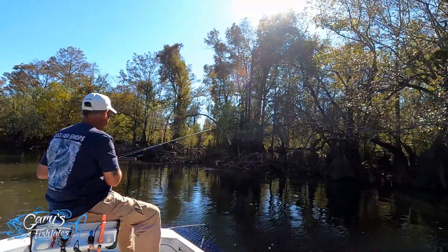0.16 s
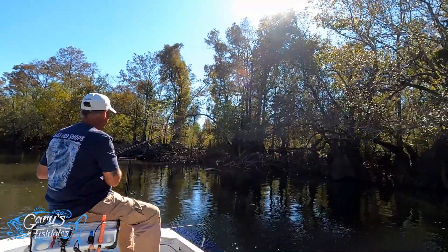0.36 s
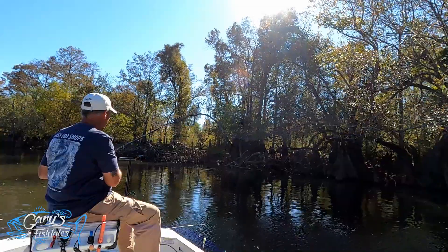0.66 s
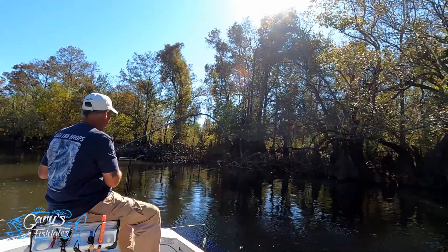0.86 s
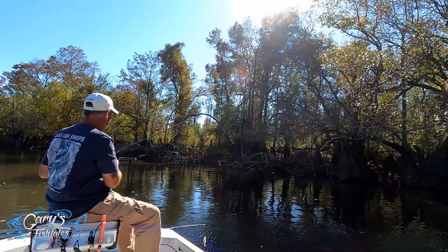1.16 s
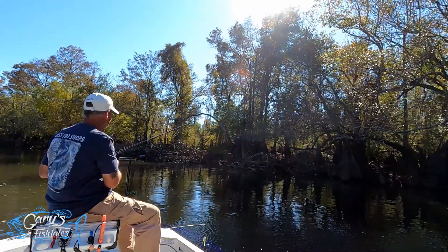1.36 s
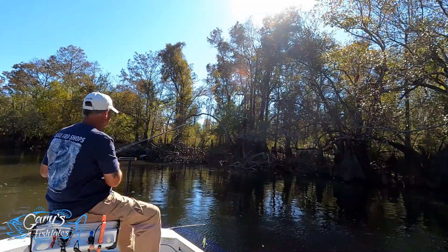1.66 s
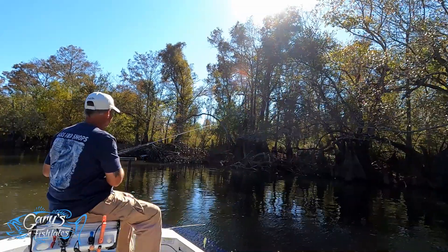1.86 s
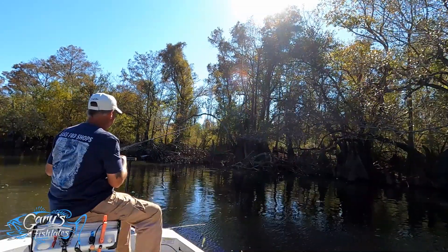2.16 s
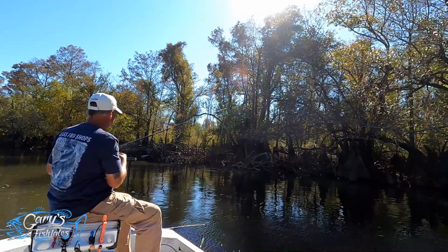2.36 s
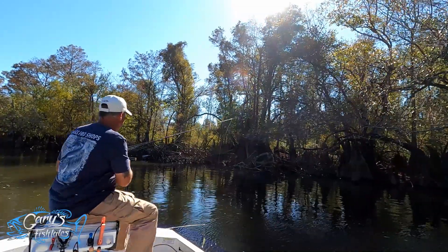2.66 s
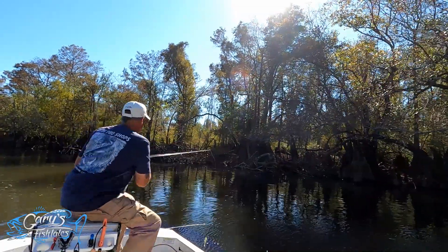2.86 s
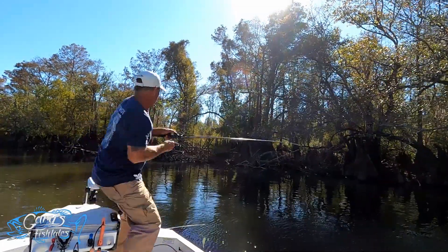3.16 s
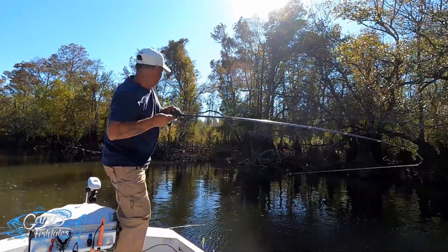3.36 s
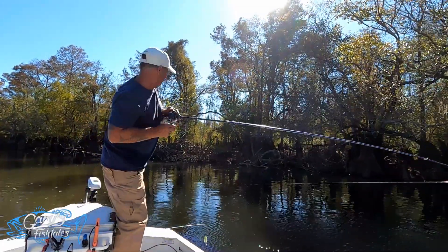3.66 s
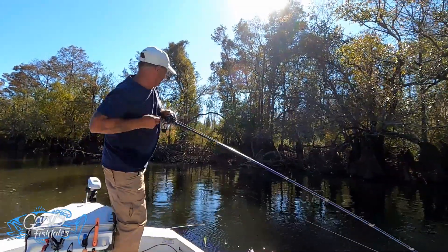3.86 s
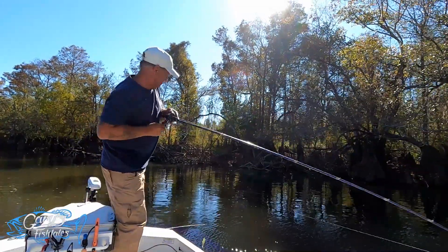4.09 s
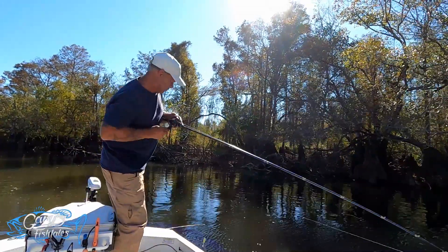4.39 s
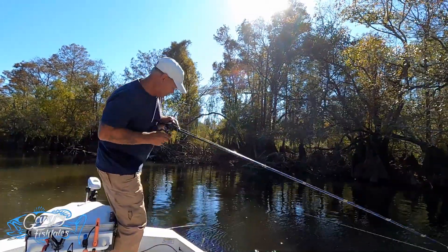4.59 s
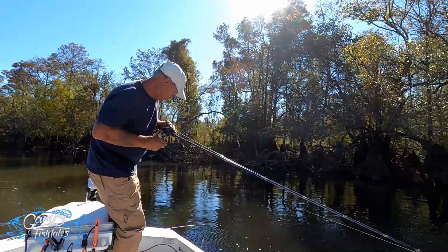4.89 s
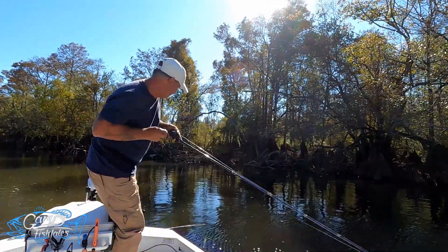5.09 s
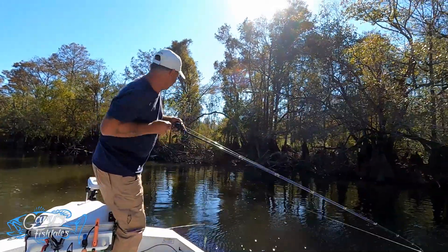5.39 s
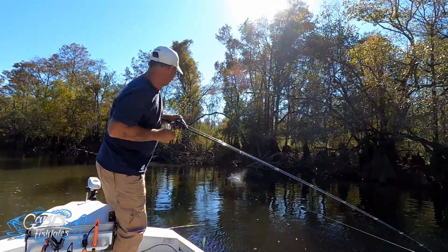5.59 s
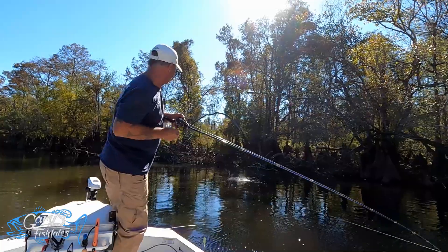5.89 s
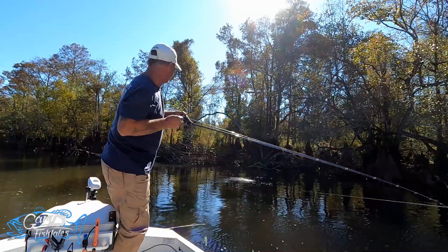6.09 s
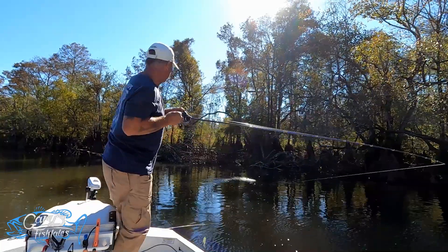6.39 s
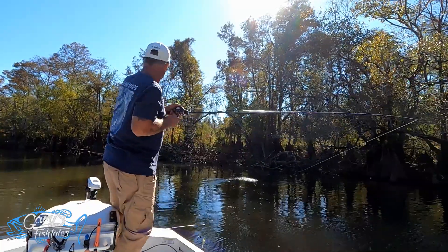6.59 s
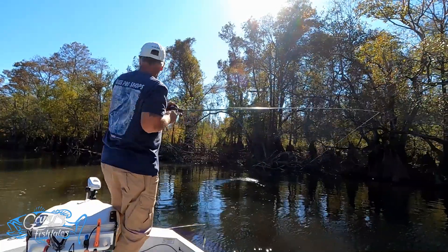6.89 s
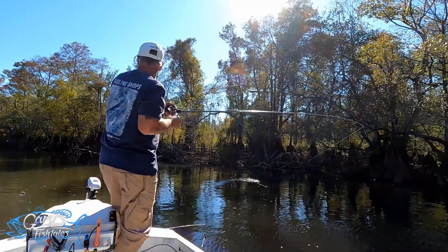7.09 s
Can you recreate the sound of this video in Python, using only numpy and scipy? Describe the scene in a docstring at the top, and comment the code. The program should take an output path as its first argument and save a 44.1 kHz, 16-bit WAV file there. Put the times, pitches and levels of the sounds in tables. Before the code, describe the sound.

Outdoors in a small boat, low wind buffets a housed microphone over a faint hiss of trees and water. Sharp tackle knocks and a brief ratcheting drag lead to a cluster of clatters and hollow deck thuds as an angler stands. Soles scuff and squeak twice. A quiet reel whirrs in pulses, then a fish thrashes with wet cracks, plops and ringing droplets, thinning to quiet reeling.

```python
"""A hooked fish thrashes at the surface of still water: droplets and bubbles ring, its tail cracks on the water.
An angler in a small boat stands up and reels in: noise through resonances makes the tackle's knocks and the
reel's whirr, damped sines the deck's thuds, grains the scuffing soles and unsteady harmonics their squeaks.
Wind buffets the housed microphone as lumpy filtered noise; trees and water rustle far off as smooth hiss."""
import sys
import numpy as np
from scipy import signal
from scipy.fft import rfft, irfft, next_fast_len
from scipy.io import wavfile
from scipy.ndimage import uniform_filter1d

SR = 44100
rng = np.random.default_rng(int(sys.argv[2]) if len(sys.argv) > 2 else 0)


def ratio_of_db(decibels):
    """Turn decibels (scalar or array-like) into linear amplitude factors; 0 dB maps to 1."""
    return 10 ** (np.asarray(decibels, float) / 20)


def bounce(signal):
    """Save signal as a 16-bit WAV file at the path given by the first command-line argument."""
    frames = np.transpose(np.atleast_2d(signal))
    limited = np.clip(frames, -1, 1)
    pcm = np.round(limited * 32767).astype(np.int16)
    wavfile.write(sys.argv[1], SR, pcm)


N = 319725   # samples, 7.25 s


def in_time(rows, outside=None):
    """Columns of a curve, interpolated at every sample; the first column is time in seconds."""
    s, *columns = np.transpose(rows)
    return [np.interp(np.arange(N) / SR, s, c, outside, outside) for c in columns]


def colour(x, points):
    """Shape a spectrum by (Hz, dB) points on a log frequency axis."""
    hz, db = np.transpose(points)
    size = next_fast_len(N + SR // 2)
    grid = np.maximum(np.fft.rfftfreq(size, 1 / SR), 1)
    gain = ratio_of_db(np.interp(np.log(grid), np.log(hz), db))
    return irfft(rfft(x, size) * gain, size)[..., :N]


def level_in(x, low_hz, high_hz):
    """Scale so that the given band has rms 1."""
    part = signal.sosfilt(signal.butter(3, [low_hz, high_hz], "band", fs=SR, output="sos"), x)
    return x / np.sqrt(np.mean(part ** 2) + 1e-20)


def drift(rate_hz):
    """Slow random wander with spread 1: noise through two equal low-pass poles, made at an eighth of the rate."""
    r = np.exp(-16 * np.pi * rate_hz / SR)
    noise = rng.standard_normal((N + SR) // 8 + 2)
    slow = signal.lfilter([1], [1, -2 * r, r * r], noise)[SR // 8:]   # drop the settling
    return np.interp(np.arange(N) / 8, np.arange(len(slow)), slow / slow.std())


def ring(clicks, hz, t60):
    """A unit click sets a decaying sine of height about 1 ringing."""
    r, w = ratio_of_db(-60 / (t60 * SR)), 2 * np.pi * hz / SR
    return signal.lfilter([0, np.sin(w)], [1, -2 * r * np.cos(w), r * r], clicks + 1e-18)


def add(out, s, sound):
    """Mix a short sound in at time s."""
    at = round(s * SR)
    out[at:at + len(sound)] += sound[:N - at]


def grains(per_s, spread_db):
    """Random clicks of uneven size and sign."""
    sizes = ratio_of_db(spread_db * np.minimum(rng.exponential(1, N), 3.5)) * rng.choice([-1, 1], N)
    return sizes * (rng.random(N) < per_s / SR)


def patchy(x, patch_db, rate_hz):
    """Third-octave bands above the bass each swell and fade on their own."""
    edges = 500 * 2 ** (np.arange(16) / 3)
    out = 0
    for k, pair in enumerate(zip(edges, edges[1:])):
        band = signal.sosfilt(signal.butter(2, pair, "band", fs=SR, output="sos"), x)
        out = out + band * ratio_of_db(patch_db * drift(rate_hz)) * (-1) ** k
    return out


def swells(starts, lengths, tops_db, peak_at, sharpness):
    """Arched envelopes, one a stroke, summed by power; peak_at is a share of the length."""
    power, bend = np.zeros(N), np.log(.5) / np.log(np.clip(peak_at, .1, .9))
    for s, length, db in zip(starts, lengths, tops_db):
        share = np.linspace(0, 1, round(length * SR))
        arch = np.abs(np.sin(np.pi * share ** bend)) ** sharpness
        add(power, s, (ratio_of_db(db) * arch) ** 2)
    return np.sqrt(power)


# Far rustle of trees and water. Each row: time in seconds, level in dB.
RUSTLE = [(0, -66), (.35, -66.5), (.8, -64), (1.4, -65.5), (1.65, -66), (2.15, -63.5), (2.35, -69),
          (2.55, -62), (2.95, -56.5), (3.1, -57.5), (3.45, -58), (3.75, -61), (4.2, -67)]
# Spectrum of that far hiss. Each row: frequency in Hz, density in dB per Hz.
RUSTLE_COLOUR = [(500, -19.5), (1000, -0.5), (1700, -1), (2300, -1), (3600, -8.5), (5000, -10.5),
                 (7000, -18.5), (13000, -34)]


def rustle():
    """Many small far sources blend into a smooth hiss."""
    hiss = level_in(colour(rng.standard_normal(N), RUSTLE_COLOUR), 1200, 7000)
    return ratio_of_db(in_time(RUSTLE)[0]) * hiss


# Wind on the microphone. Each row: time in seconds, rumble level in dB, upper flutter level in dB.
WIND = [(0, -43, -65), (.5, -40.5, -60.5), (.63, -38.5, -50.5), (.85, -47, -70.5), (1.35, -42.5, -59),
        (1.45, -38, -53), (1.6, -42, -62), (2.0, -40, -52.5), (2.2, -39.5, -52.5), (2.75, -37.5, -57),
        (2.9, -39.5, -52.5), (3.6, -38.5, -53), (4.8, -41.5, -54.5), (5.2, -44, -60.5), (5.52, -42.5, -55),
        (5.8, -47.5, -53.5), (6.36, -42, -59), (6.66, -46, -59), (6.76, -44.5, -57), (7.25, -45.5, -60.5)]
# Spectrum of the rumble at the port. Each row: frequency in Hz, density in dB per Hz.
RUMBLE_COLOUR = [(20, -15.5), (50, -1.5), (110, 1), (200, -3), (300, -10), (450, -19.5), (900, -75)]
# Spectrum of the upper flutter at the port. Each row: frequency in Hz, density in dB per Hz.
FLUTTER_COLOUR = [(150, -6), (300, 1.5), (500, 3), (820, -3.5), (920, -14), (1200, -45.5)]
# The strongest puffs on the microphone. Each row: start in seconds, level in dB.
PUFFS = [(0.471, -46.5), (1.101, -53), (1.329, -46.5), (1.748, -39), (2.096, -35), (2.203, -40.5),
         (2.426, -51), (2.501, -37.5), (3.065, -34.5), (3.533, -41), (3.584, -52), (3.66, -40),
         (3.748, -47), (3.827, -45), (3.934, -45.5), (3.981, -55), (4.175, -40.5), (4.257, -43.5),
         (4.389, -44), (4.522, -42.5), (4.825, -57), (5.038, -42.5), (5.267, -38.5), (5.375, -39.5)]


def wind():
    """Eddies hit the port in lumps; the upper flutter comes in shorter puffs, the strongest at given moments."""
    puff_rise_s, puff_t60_s, puff_rumble_db = 0.0027, 0.057, -2.5
    rumble_db, flutter_db = in_time(WIND)
    lumps = drift(10.0)
    rumble = colour(rng.standard_normal(N), RUMBLE_COLOUR) * ratio_of_db(1.2 * drift(3.1) + 2.1 * lumps)
    rumble = level_in(rumble, 30, 270)
    flutter = level_in(colour(rng.standard_normal(N), FLUTTER_COLOUR), 450, 850)
    puffs, t = np.zeros(N), np.arange(SR // 8) / SR
    for s, puff_db in PUFFS:
        add(puffs, s, ratio_of_db(puff_db) * np.minimum(t / puff_rise_s, 1) * ratio_of_db(-60 * t / puff_t60_s))
    uneven = ratio_of_db(flutter_db + 2.96 * lumps + 2.9 * drift(60.) + 1.2 * drift(8.8))
    return (ratio_of_db(rumble_db) + ratio_of_db(puff_rumble_db) * puffs) * rumble + (uneven + puffs) * flutter


# Thuds on the hollow deck, close by, and last a low plop of water.
# Each row: start in seconds, level in dB, main mode in Hz, t60 in seconds, rise in seconds.
THUDS = [(0.637, -33.5, 223, 0.085, 0.0033), (1.831, -27.5, 492, 0.1, 0.00076),
         (1.846, -37, 655, 0.063, .002), (1.861, -33, 410, 0.049, 0.0036), (2.028, -29.5, 494, 0.09, .003),
         (2.045, -28.5, 501, 0.037, .003), (2.061, -40, 424, 0.11, 0.0027),
         (2.658, -35, 419, 0.045, 0.0023), (2.687, -36.5, 474, 0.26, 0.0034),
         (2.722, -34.5, 412, 0.034, 0.0018), (2.739, -31.5, 623, 0.024, 0.0038),
         (2.748, -24.5, 344.6, 0.16, 0.0067), (2.777, -28.5, 326, 0.13, 0.003),
         (2.8, -38, 504, 0.038, 0.0018), (2.818, -27, 200, 0.042, 0.0056), (2.829, -23, 439, 0.049, 0.0031),
         (6.326, -45, 145, 0.031, .002)]


def thuds():
    """A soft blow swells a main mode; its rough contact shakes three other modes."""
    rough_db = -5
    out, t = np.zeros(N), np.arange(SR // 4) / SR
    for s, level_db, hz, t60, rise_s in THUDS:
        push = rng.standard_normal(len(t)) * ratio_of_db(-60 * t / (0.63 * t60))
        boom = (1 - np.exp(-t / rise_s)) * ratio_of_db(-60 * t / t60) * np.sin(2 * np.pi * hz * t)
        rough = ring(push, 1.566 * hz, 0.26 * t60) + ring(push, 0.67 * hz, 0.65 * t60)
        rough = rough + 0.82 * ring(push, 2.16 * hz, 0.17 * t60)
        thud = boom / np.abs(boom).max() + ratio_of_db(rough_db) * rough / np.abs(rough).max()
        add(out, s, ratio_of_db(level_db) * thud)
    return out


# Soles and gear dragging on the deck.
# Each row: start in seconds, length in seconds, grit level in dB, dull rub level in dB.
SCUFFS = [(2.016, 0.088, -60, -54), (2.018, 0.046, -64, -32.5), (2.033, 0.053, -60, -33.5),
          (2.664, 0.074, -57, -48.5), (2.736, 0.034, -59, -66), (2.826, 0.068, -37.5, -59),
          (2.882, 0.18, -55, -93), (3.11, 0.13, -52, -88), (3.161, 0.086, -42.5, -39.5),
          (3.22, 0.033, -51, -60), (3.238, 0.15, -33, -98), (3.356, 0.15, -54, -71)]
# Spectrum of the bright grit. Each row: frequency in Hz, density in dB per Hz.
GRIT_COLOUR = [(700, 1), (1500, -2.5), (2500, 3), (4000, 3), (5500, -8.5), (7000, -5.5), (13000, 8.5)]
# Spectrum of the dull rub. Each row: frequency in Hz, density in dB per Hz.
RUB_COLOUR = [(400, -13), (600, 6), (900, 14), (1250, 8.5), (1700, -4), (2600, -12), (5000, -46)]


def sole():
    """Dragging over grit gives dense random clicks, one layer bright and one dull."""
    grit = level_in(colour(grains(6000, 1.1), GRIT_COLOUR), 2280, 11300)
    rub = level_in(colour(grains(2800, 1.3), RUB_COLOUR), 530, 2200)
    s, length, grit_db, rub_db = np.transpose(SCUFFS)
    grit = swells(s, length, grit_db, peak_at=0.41, sharpness=1.35) * grit
    return grit + swells(s, length, rub_db, peak_at=0.3, sharpness=7.5) * rub


# The sole's squeaks on the deck, one list a squeak.
# Each row: time in seconds, pitch in Hz, level in dB, roughness from 0 to 1.
SQUEAKS = [
    [(3.168, 550, -46, .35), (3.176, 575, -36, .45), (3.184, 585, -35, .5), (3.196, 550, -35, .55),
     (3.204, 480, -37, .55), (3.214, 440, -41, .5), (3.224, 430, -41, .4), (3.232, 380, -50, .4)],
    [(3.262, 1000, -52, 0.2), (3.272, 1220, -43, 0.2), (3.278, 1300, -32, 0.2), (3.29, 1490, -32, 0.12),
     (3.303, 1500, -33, 0.12), (3.316, 1330, -34, 0.12), (3.328, 1120, -43, .25)],
]
# Overtones of the squeaking sole. Each row is one squeak: levels in dB of multiples 1, 2, .. of the pitch.
SQUEAK_PARTIALS = [
    [-1, -14, -5, -13, -16, -20, -22],
    [-4, -12, -17, -26],
]


def squeaks():
    """Stick-slip tones; roughness shakes the pitch, grit tears each partial alone, overtones fade first."""
    jitter, flutter_db = .12, 4   # at full roughness
    out = 0
    for rows, partials_db in zip(SQUEAKS, SQUEAK_PARTIALS):
        hz, _, rough = in_time(rows)
        gain = ratio_of_db(in_time(rows, outside=-200)[1])
        pitch = uniform_filter1d(hz, size=200) * (1 + jitter * rough * drift(290.0))
        phase = 2 * np.pi * np.cumsum(pitch) / SR
        tone = 0
        for k, partial_db in enumerate(partials_db):
            torn = ratio_of_db(partial_db + (flutter_db * rough + min(k, 2)) * drift(84.0))
            fade = (gain / gain.max()) ** (k > 0)   # overtones only
            tone = tone + torn * fade * np.sin((k + 1) * phase)
        out = out + np.sqrt(2) * uniform_filter1d(gain, size=150) * tone
    return out


# Knocks of reel and tackle, close by.
# Each row: start in seconds, level in dB, rattle t60 in seconds at 2500 Hz, brightness in dB per octave.
KNOCKS = [(0.0288, -34.5, 0.13, 19), (0.6067, -12.5, 0.016, 1), (0.6115, -23, 0.11, 11),
          (0.621, -30.5, 0.15, 4), (1.6686, -40.5, 0.58, -6), (1.7556, -36, 1, -7),
          (1.831, -5.5, 0.0067, -4), (1.8365, -19.5, 0.027, 8), (1.847, -24.5, 0.1, 4),
          (2.027, -30.5, 0.023, 0), (2.033, -29, 0.018, -3), (2.036, -31.5, 0.02, 11),
          (2.0465, -21, 0.032, 1.5), (2.052, -28.5, 0.045, -4), (2.139, -33, 0.028, 18),
          (2.548, -32, 0.37, 24), (2.602, -38, 0.053, 6), (2.6569, -17.5, 0.008, 20.5),
          (2.688, -30, 0.02, 3), (2.6997, -29.5, 0.03, 15), (2.7207, -14, 0.19, 16.5),
          (2.7405, -20, 0.042, -2), (2.7512, -15.5, 0.04, 11), (2.73, -27, 0.04, -4),
          (2.761, -28, 0.04, -6), (2.7975, -21, 0.02, 16), (2.801, -13.5, 0.14, 13), (2.812, -33, 0.05, 2),
          (2.8258, -21, 0.054, -21), (3.027, -37, 0.058, -1), (3.041, -32.5, 0.059, 9),
          (3.181, -24, 0.031, -7), (3.414, -32.5, 0.074, 12), (3.5657, -38.5, 0.043, 2),
          (3.6132, -34.5, 0.04, -7), (3.6622, -37, 0.051, -27)]
# Modes of the tackle. Each row: frequency in Hz, level in dB, t60 in seconds.
TACKLE = [(950, -12, .006), (1250, -6, .006), (1850, -4, .006), (2400, -1, .005), (2950, 1, .0045),
          (3600, 0, .004), (4300, 0, .004), (5300, -6, .0035), (6600, -8, .003)]


def knocks():
    """A hard first contact and a short rattle drive the tackle's modes, plus a crack; the treble dies first."""
    treble_dies_faster = .6   # power of frequency by which a rattle shortens
    crack_cut = signal.butter(2, 1300, "high", fs=SR)
    out, t = np.zeros(N), np.arange(SR // 5) / SR
    for s, level_db, t60, bright_db in KNOCKS:
        noise, strengths = rng.standard_normal(len(t)), rng.normal(0, 2.5, len(TACKLE))

        def rattle(hz):
            """Noise of contact and rattle as it drives a mode at hz."""
            aged = t * (hz / 2500) ** treble_dies_faster
            return noise * np.minimum(t / 0.0012, 1) * (ratio_of_db(-60 * aged / 0.03) + 0.5 * ratio_of_db(-60 * aged / t60))

        body = 0
        for (hz, db, ring_s), strength_db in zip(TACKLE, strengths):
            mode_gain = ratio_of_db(db + strength_db + bright_db * np.log2(hz / 2500))
            body = body + mode_gain * ring(rattle(hz), hz, ring_s)
        tilt = np.clip(0.057 + 0.054 * bright_db, 0, .99)
        crack = signal.lfilter([1, -tilt], [1, -.5], signal.lfilter(*crack_cut, rattle(2500)))
        add(out, s, ratio_of_db(level_db) * (0.52 * body / np.abs(body).max() + 0.5 * crack / np.abs(crack).max()))
    return out


# The drag pawl slipping over its teeth. Each row: time in seconds, rate in teeth per second, level in dB.
PAWL = [(1.904, 95, -21), (1.925, 95, -17), (1.934, 127, -15), (1.941, 160, -15.5), (1.968, 175, -16),
        (1.976, 175, -28), (1.99, 175, -38)]
# Resonances of the pawl. Each row: frequency in Hz, nominal width in Hz, level in dB.
PAWL_RINGS = [(1195, 120, 2), (2720, 310, 8), (3800, 370, 12), (4500, 290, 8), (6880, 540, 7)]


def pawl():
    """Teeth come faster as the spool slips; each tick is a puff of noise in a few resonances."""
    per_s, db = in_time(PAWL)
    t = np.arange(N) / SR
    slipping = (t >= PAWL[0][0]) & (t < PAWL[-1][0])
    teeth = np.cumsum(per_s * slipping) / SR
    ticks = np.diff(np.ceil(teeth), prepend=0) * ratio_of_db(db)
    puffs = signal.lfilter([1], [1, -ratio_of_db(-60 / (0.026 * SR))], ticks) * rng.choice([-1, 1], N)   # t60 26 ms
    out = 0.2 * puffs
    for hz, width, ring_db in PAWL_RINGS:
        out = out + ratio_of_db(ring_db) * 0.0083 * np.sqrt(width / 300) * ring(puffs, hz, 1.6 / width)
    return out


# Pushes of the crank. Each row: start in seconds, length in seconds, whirr level in dB, reel body ring in dB.
CRANK = [(3.815, 0.15, -59, -63), (3.935, 0.13, -54, -61.5), (4.094, 0.11, -55.5, -58.5),
         (4.214, 0.19, -54, -56), (4.388, 0.11, -57, -57), (4.492, 0.056, -63.5, -60.5),
         (4.539, 0.12, -60, -60), (4.666, 0.13, -58, -59.5), (4.763, 0.34, -56, -56),
         (5.089, 0.22, -60, -58.5), (5.268, 0.16, -60, -55.5), (5.4, 0.59, -58, -55.5),
         (5.514, 0.22, -53.5, -55), (5.804, 0.42, -58, -55), (6.07, 0.42, -60.5, -62),
         (6.406, 0.32, -61.5, -63.5), (6.732, 0.25, -61.5, -63.5), (6.964, 0.42, -61, -70)]
# Spectrum of the gear friction. Each row: frequency in Hz, density in dB per Hz.
GEAR_COLOUR = [(800, -60), (1200, 0.5), (2000, 5.5), (3200, -0.5), (4000, 0.5), (4800, 0), (7000, -2),
               (10500, 9.5), (13000, 19.5)]
# Modes of the reel body. Each row: frequency in Hz, level in dB, t60 in seconds.
REEL_MODES = [(2200, -8, .03), (2650, -4, .035), (3030, -1, .04), (3450, -2, .035), (3780, 0, .04),
              (4300, -3, .035)]


def gears():
    """Fine dense gear friction swells and brightens with the hand; the reel body rings on and off."""
    peak_at, coast_db, coast_from_s = 0.45, -70, 3.76   # between pushes the spool coasts
    mode_flicker_db, mode_share = 3.5, .65
    s, length, push_tops_db, body_db = np.transpose(CRANK)
    turning = np.clip((np.arange(N) / SR - coast_from_s) / 0.022, 0, 1)
    push = swells(s, length, push_tops_db, peak_at, sharpness=1)
    push_db = 20 * np.log10(np.hypot(push, ratio_of_db(coast_db)))
    friction = patchy(rng.standard_normal(N) + .25 * grains(1400, 4.6), 2.5, 6.7)
    whirr = level_in(colour(friction, GEAR_COLOUR), 5280, 7970)
    treble = signal.sosfilt(signal.butter(4, 8000, "high", fs=SR, output="sos"), whirr)
    whirr = whirr + treble * (ratio_of_db(0.067 * (push_db + 48.5)) - 1)   # the treble follows the push more steeply
    broad = level_in(ring(ring(rng.standard_normal(N), 3600, 0.0011), 3600, 0.0011), 3120, 3600)
    mesh, modes = rng.standard_normal(N), 0
    for hz, db, t60 in REEL_MODES:
        modes = modes + ratio_of_db(db + mode_flicker_db * drift(7.6)) * ring(mesh, hz, t60)
    body = np.sqrt(1 - mode_share ** 2) * broad + mode_share * level_in(modes, 3005, 3790)
    body = swells(s, length, body_db, peak_at, sharpness=0.55) * body
    return turning * ratio_of_db(1.87 * drift(25.0)) * (ratio_of_db(push_db) * whirr + body)


# Spray as the fish thrashes at the surface. Each row: time in seconds, level in dB.
THRASH = [(5.398, -39), (5.43, -43.5), (5.455, -40.5), (5.55, -43.5), (5.575, -36.5), (5.635, -45),
          (5.66, -34), (5.7, -39.5), (5.76, -42.5), (5.8, -44.5), (5.87, -43.5), (5.94, -42.5),
          (6.0, -44.5), (6.05, -45), (6.11, -42), (6.19, -52), (6.3, -51.5), (6.43, -59), (6.62, -58),
          (6.72, -63.5), (6.8, -47), (6.86, -59.5), (7.25, -62)]
# Colour given to the spray. Each row: frequency in Hz, weight in dB per Hz.
SPRAY_COLOUR = [(350, -5), (600, -16), (800, 0.5), (1400, -0.5), (2000, -1), (2900, -8.5), (4000, -19.5),
                (4650, -28), (5600, -8), (7000, -42), (13000, -49)]


def spray():
    """Droplets ring for some tens of cycles each at scattered pitches over the hiss of torn water."""
    db = in_time(THRASH, outside=-200)[0]
    tilt_db = 16.5 + 2.5 * drift(34.0)   # per octave, wavering
    born = grains(1200 * ratio_of_db(4 * drift(25.)), 3.6)
    pitches, dealt = np.geomspace(700, 4600, 24), rng.integers(0, 24, N)
    fizz = 0
    for k, hz in enumerate(pitches):
        drops = born * (dealt == k) * ratio_of_db(tilt_db * np.log2(hz / 2200))
        fizz = fizz + ring(drops, hz, 62.0 / hz) * np.sqrt(hz)
    fizz = level_in(colour(fizz, SPRAY_COLOUR), 690, 6400)
    torn = patchy(rng.standard_normal(N) * ratio_of_db(1.1 * drift(39.0)), 2.7, 27.0)
    torn = level_in(colour(torn, SPRAY_COLOUR), 1100, 4800)
    return ratio_of_db(db) * (.5 * torn + .75 * fizz)


# Large drops and trapped bubbles at the surface.
# Each row: start in seconds, level in dB, pitch in Hz, cycles in which the ring falls 40 dB.
DROPS = [(1.671, -49, 2200, 81), (5.405, -29, 5540, 32), (5.447, -21, 2780, 6.9), (5.466, -23, 910, 9),
         (5.489, -21.5, 870, 19.5), (5.492, -26, 1510, 8), (5.517, -24, 198, 5.7), (5.533, -29, 3200, 8),
         (5.563, -32, 300, 4.3), (5.598, -29, 1940, 15), (5.621, -26, 2270, 22), (5.634, -27, 1880, 14),
         (5.654, -36, 960, 7), (5.669, -30, 2410, 8.5), (5.694, -26, 1850, 10), (5.5691, -25, 2270, 20),
         (5.608, -27, 1130, 20), (5.651, -24, 2300, 5.5), (5.68, -14.5, 2980, 7.2), (5.696, -19, 2620, 5.5),
         (5.704, -30.5, 848, 49), (5.7135, -30, 2780, 7.7), (5.721, -32, 980, 30), (5.7283, -32, 1820, 25),
         (5.733, -32, 2780, 25), (5.742, -37, 1880, 45), (5.772, -30, 1750, 8), (5.846, -33, 480, 9),
         (5.87, -28, 2320, 16), (5.893, -24, 2600, 8), (5.958, -35, 1740, 10), (5.771, -21.5, 900, 9.7),
         (5.906, -34, 860, 23), (5.995, -26.5, 2700, 11), (6.032, -25.5, 900, 10), (6.05, -39, 830, 18),
         (6.051, -28, 331, 11), (6.0545, -21.5, 2200, 11), (6.082, -21, 184, 5.7),
         (6.105, -16.5, 2970, 6.8), (6.106, -29.5, 4130, 14), (6.092, -25, 2070, 10),
         (6.139, -30.5, 860, 9.4), (6.2048, -16, 3470, 11.4), (6.201, -29.5, 2020, 8.4),
         (6.2572, -26, 2100, 8.7), (6.259, -30, 3700, 16), (6.2833, -17.5, 3560, 8.2),
         (6.3096, -33, 2000, 13)]
# One bubble rising to the surface. Each row: time in seconds, pitch in Hz, level in dB.
RISER = [(6.95, 500, -60), (6.98, 530, -52), (6.996, 710, -55), (7.012, 900, -55), (7.03, 1560, -55),
         (7.046, 2050, -63)]


def plops():
    """A bubble rings at its size and rises in pitch as it nears the surface."""
    out = np.zeros(N)
    for s, level_db, hz, cycles in DROPS:
        turns = np.arange(round(2 * cycles * SR / hz)) * hz / SR
        shape = np.minimum(turns / 0.97, 1) * ratio_of_db(-40 * turns / cycles)
        add(out, s, ratio_of_db(level_db) * shape * np.sin(2 * np.pi * turns * (1 + 0.0011 * turns)))
    hz, db = in_time(RISER)[0], in_time(RISER, outside=-200)[1]
    return out + ratio_of_db(db) * np.sin(2 * np.pi * np.cumsum(hz) / SR)


# Slaps of the tail on the surface. Each row: start in seconds, peak in dB, spray t60 in seconds, centre in Hz.
SLAPS = [(5.401, -26, 0.026, 3200), (5.4086, -22.5, 0.017, 2010), (5.57, -24.5, 0.12, 2410),
         (5.6062, -29, 0.027, 2230), (6.0331, -19, 0.042, 3040), (6.2052, -31, 0.02, 3600),
         (6.281, -36, 0.016, 3850)]


def slaps():
    """The tail slaps the surface: a wide, sharp crack with a little spray behind it."""
    out, t = np.zeros(N), np.arange(SR // 10) / SR
    for s, peak_db, t60, hz in SLAPS:
        noise = rng.standard_normal(len(t)) * (ratio_of_db(-60 * t / 0.003) + 0.16 * ratio_of_db(-60 * t / t60))
        crack = ring(1.5 * (t == 0) + noise, hz, 0.0005)
        add(out, s, ratio_of_db(peak_db) * crack / np.abs(crack).max())
    return out


def scene():
    """All layers in mono on two channels; blows and drops get a brief dull slap back from hull and water."""
    slap_back_db, slap_back_cut_hz, slap_back_t60_s = -30, 2960, 0.12
    near = knocks() + pawl() + thuds() + plops() + slaps()
    tail = rng.standard_normal(SR // 5) * ratio_of_db(-60 * np.arange(SR // 5) / SR / slap_back_t60_s)
    tail = signal.sosfilt(signal.butter(1, slap_back_cut_hz, fs=SR, output="sos"), tail)
    slap_back = ratio_of_db(slap_back_db) * signal.fftconvolve(near, tail)[:N]
    mono = near + slap_back + squeaks() + sole() + gears() + spray() + rustle() + wind()
    return np.array([mono, mono])


def band_limit(x):
    """A steep low-pass at the top of the band."""
    return signal.sosfilt(signal.butter(12, 13590, fs=SR, output="sos"), x)


# Response of the microphone's housing and port. Each row: frequency in Hz, gain in dB.
MIC = [(6800, 0), (7700, -7.5), (8600, -21.5), (8950, -20.5), (9080, -42), (9250, -24.5), (10600, -13.5),
       (11600, -29.5), (13400, -42.5)]
# Slight left-right difference, strongest in the top treble. Each row: frequency in Hz, side gain over mid in dB.
SIDE = [(60, -44), (150, -41.5), (360, -45), (880, -40), (2160, -33), (5300, -24), (8000, -16),
        (10600, -15.5), (12200, -4)]


def record(dry):
    """The housing notches the treble; left and right differ slightly and unsteadily, most in the top treble."""
    mid = colour(dry[0], MIC)
    side = colour(mid * (drift(400.) - .4), SIDE)
    return band_limit(np.array([mid + side, mid - side]))


dry = scene()
out = record(dry)
bounce(out)
```